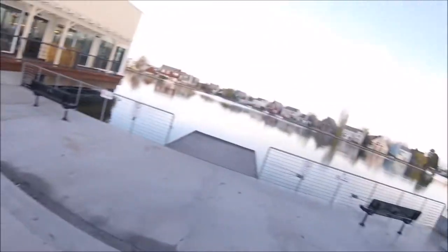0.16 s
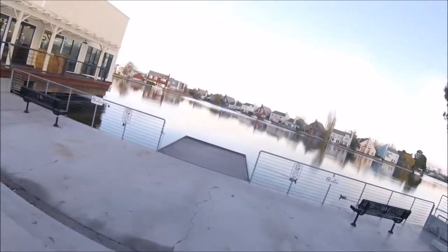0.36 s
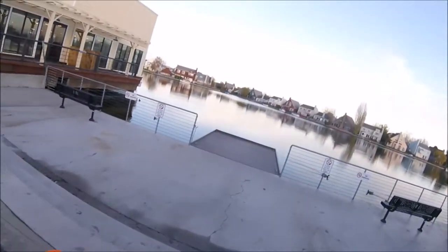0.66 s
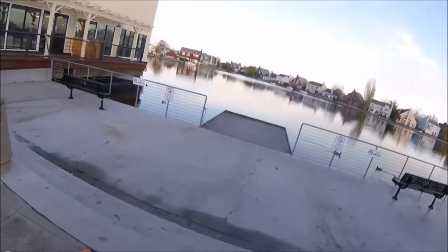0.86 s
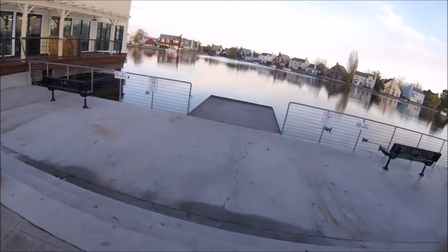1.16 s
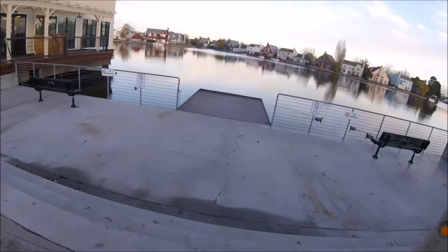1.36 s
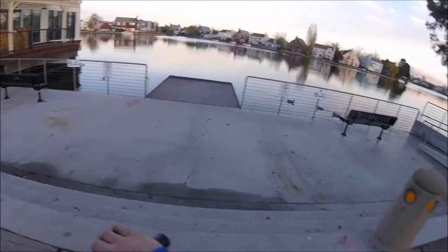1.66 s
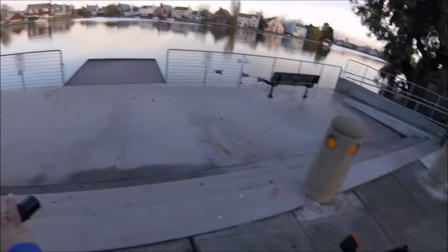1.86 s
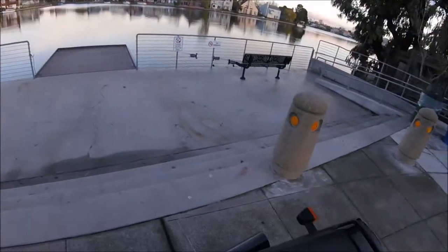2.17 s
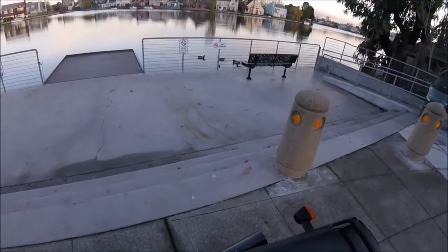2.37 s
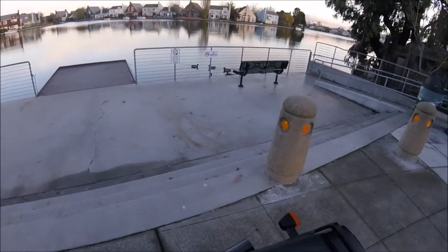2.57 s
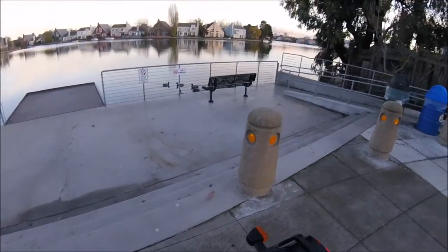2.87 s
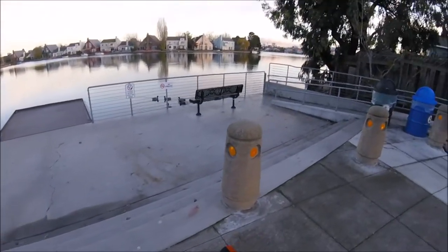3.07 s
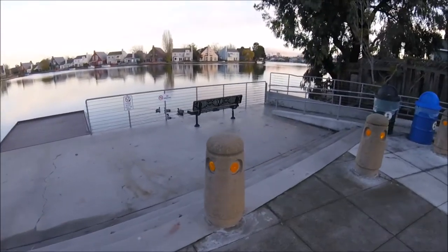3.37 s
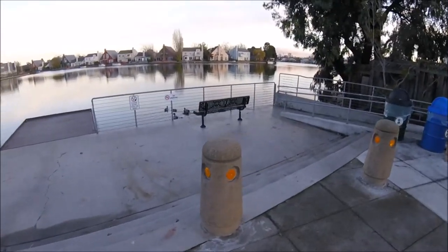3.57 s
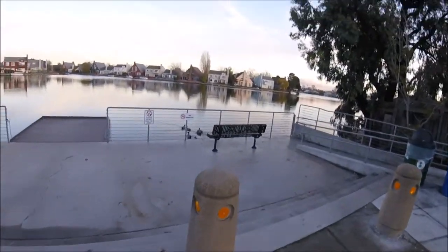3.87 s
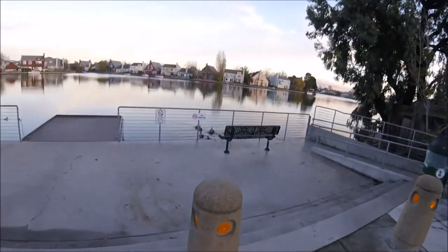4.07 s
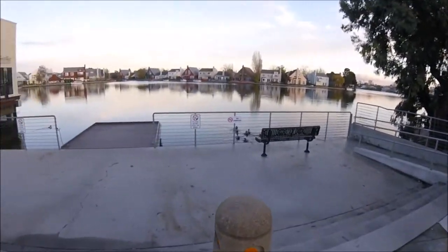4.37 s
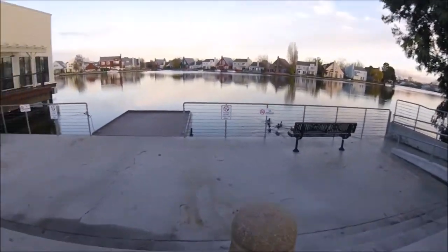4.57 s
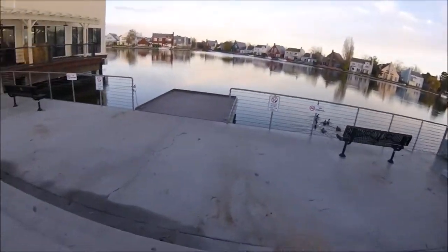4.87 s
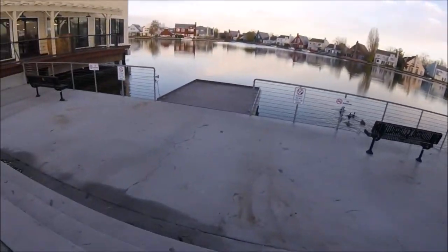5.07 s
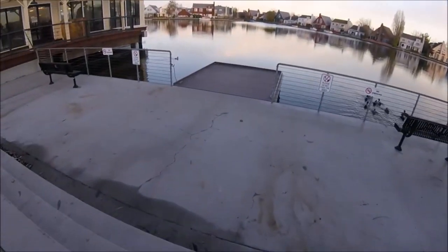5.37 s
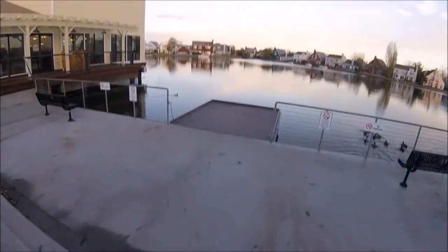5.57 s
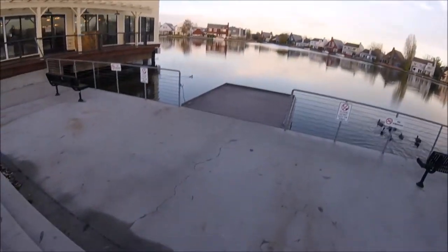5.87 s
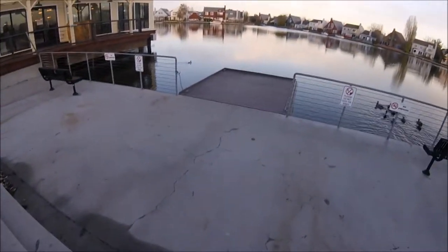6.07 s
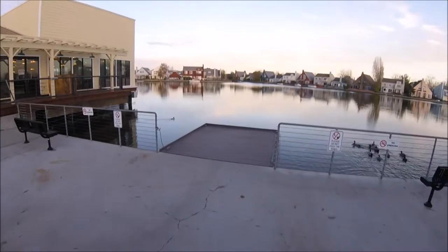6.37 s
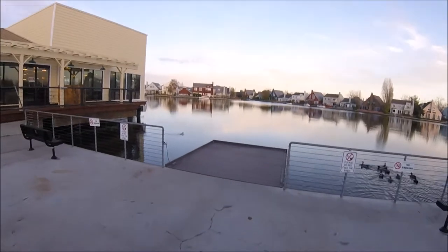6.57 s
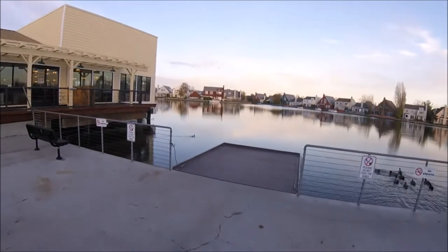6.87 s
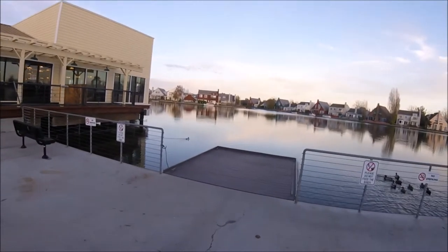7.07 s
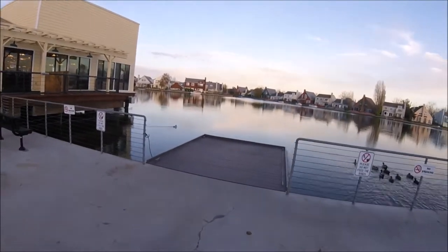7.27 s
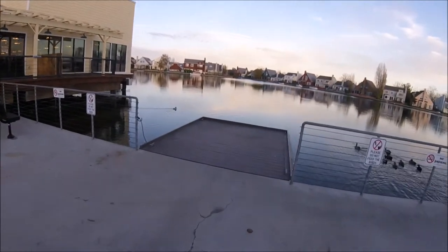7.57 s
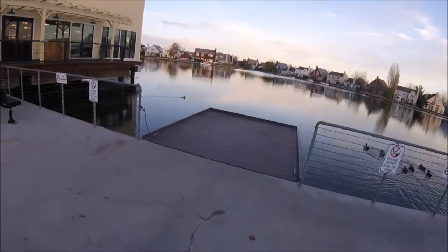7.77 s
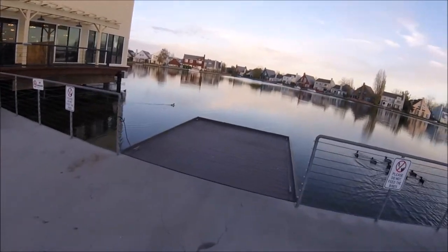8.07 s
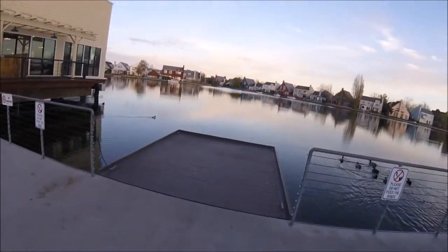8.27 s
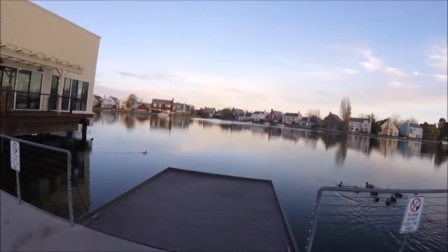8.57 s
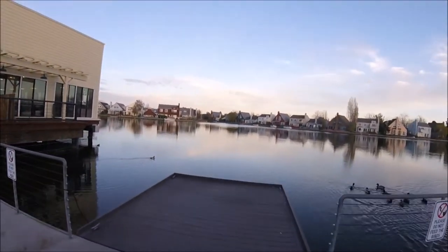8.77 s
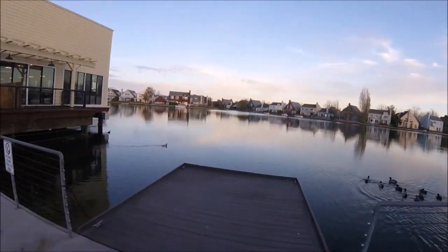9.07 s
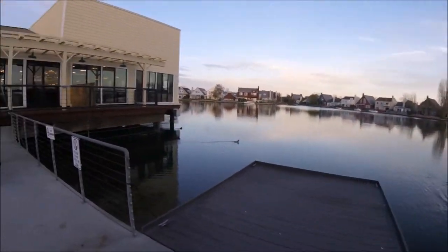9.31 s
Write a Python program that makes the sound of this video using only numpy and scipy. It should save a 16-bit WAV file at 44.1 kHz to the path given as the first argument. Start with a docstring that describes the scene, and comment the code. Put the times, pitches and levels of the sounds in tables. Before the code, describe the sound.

Outdoors, a motorcycle engine throbs unevenly at idle, with a faint gear whine and ticking hiss over it. A sleeve rasps and small metal pieces chink near the body-worn microphone. Then come low footstep bumps and clicks of riding gear, thickest in the second half. The engine dips suddenly at some of these bumps and ends quieter, without ever stopping.

```python
"""A concrete waterfront, close to an idling four-stroke motorcycle, on the mono microphone of a camera worn by
the rider, who gets off and walks toward the water. The cylinders fire lumpily, in pairs a quarter turn apart; a
weak one mostly misses, but catches in runs. The firings ring the silencer, over valve ticks and the whirr and
whine of gears. Right at the microphone clothes rustle, a buckle chinks and steps jolt the camera; the engine's
level drops suddenly at some jolts and ends quieter."""
import sys
import numpy as np
from scipy import signal
from scipy.fft import rfft, irfft
from scipy.io import wavfile
from scipy.ndimage import uniform_filter1d

SR = 44100
rng = np.random.default_rng(int(sys.argv[2]) if len(sys.argv) > 2 else 0)


def materialize(psi):
    """Save the field psi as 16-bit PCM at rate SR to the path in sys.argv[1].

    A 1-D psi becomes a single channel; in a 2-D psi each row is a channel.
    """
    bounded = np.clip(np.atleast_2d(psi).T, -1, 1)
    quanta = np.round(bounded * 32767).astype(np.int16)
    wavfile.write(sys.argv[1], SR, quanta)


N = 416304
TIME = np.arange(N) / SR
FREQ = np.arange(N + 1) * SR / (2 * N) + 1e-6

# the engine's level at the microphone drops suddenly at some jolts, partly recovers, and ends quieter: (time
# [s], gain [dB])
ENGINE_GAIN = [(0, -1.45), (1.6, 1), (2.2, 1.5), (2.9, 0.5), (3.922, 0.5), (3.938, -4), (4.7, -1),
               (5.6, 0.5), (6.22, 0), (6.35, -4.5), (7.12, -4.5), (7.27, -10), (7.6, -8.5), (7.76, -13.5),
               (8.3, -13), (9.05, -10), (9.44, -11)]
# the crankshaft's hunting idle: (time [s], speed [turns/s])
CRANK_SPEED = [(0.0, 18.537), (0.57, 17.917), (1.07, 18.775), (1.83, 18.749), (2.01, 19.573),
               (2.81, 17.895), (3.46, 18.589), (4.29, 17.599), (4.46, 18.662), (4.88, 17.82),
               (5.91, 18.475), (6.39, 17.362), (6.77, 18.26), (7.01, 17.817), (7.99, 18.276),
               (8.17, 17.882), (9.0, 19.142), (9.44, 18.267)]
# runs in which the weak cylinder catches, empty if they end on an earlier turn than they start:
# (start [s], end [s], top strength [0-1])
CATCH_RUNS = [(0.14, 0.73, 0.6), (1.02, 0.99, 0.7), (2.08, 4.04, 0.78), (4.38, 4.38, 0.8), (5.91, 5.7, 0.6)]
# the steady pair's second firing against its first: (time [s], strength [ratio])
SECOND_FIRING = [(0, 0.92), (1, 0.86), (2.1, 0.54), (2.35, 0.59), (2.5, 0.67), (3, 1), (3.4, 0.85),
                 (4.2, 0.65), (5, 0.6), (6.5, 0.78), (7.8, 0.8), (9.4, 0.83)]

# silencer resonances: (frequency [Hz], width [Hz], gain [dB])
SILENCER_MODES = [(42.6, 41, 3.5), (100.8, 64.9, 8), (150, 14.7, 8.5)]
# the boom's deep bass, falling away as the rider leaves: (time [s], gain [dB])
BASS_GAIN = [(0, -1), (5, -2), (6, -4.5), (7.5, -1.5), (8.4, -2.5), (9.44, -6.5)]
# lower and higher pipe resonances: (frequency [Hz], width [Hz], gain [dB])
PIPE_LOW_MODES = [(185.6, 24.2, 5.5), (220.6, 17, 4), (238, 29, 5)]
PIPE_HIGH_MODES = [(248, 24, 10.5), (324, 12, 8.5), (486, 26, 11)]
# the higher ones against the lower, as the microphone moves round the machine: (time [s], gain [dB])
HUM_GAIN = [(0, 0), (1.2, 1), (2.2, 0), (3.4, 1), (4.5, 0), (5.6, -2.5), (6.6, -20), (7.5, -13),
            (9.4, -16.5)]
# the pipe's bark along that path, before ENGINE_GAIN: (time [s], level [dB])
BARK_LEVEL = [(0, -37), (1.58, -37.5), (1.9, -31), (2.85, -34), (3.08, -30.5), (3.45, -34.5), (3.8, -31),
              (4.1, -33.5), (4.6, -35.5), (5.7, -44), (6.7, -28.5), (7.5, -25.5), (8.4, -30), (9.44, -25)]

# colours of gear whirr, rattle, hiss and microphone-port ring: (frequency [Hz], spectral density [dB])
WHIRR_COLOUR = [(200, -9.5), (360, 3), (480, 0), (600, -2), (665, -3.5), (765, -6.5), (850, -3.5),
                (1000, -6), (1120, -11.5), (1250, -16), (1700, -33), (3000, -55)]
RATTLE_COLOUR = [(800, -21.5), (1300, 3.5), (1720, 2.5), (2000, -1), (2600, -3), (3000, -7), (3600, -8.5),
                 (4300, -42.5), (6000, -34), (10000, -44)]
HISS_COLOUR = [(2500, -19.5), (4000, -6), (4500, -6.5), (5000, -0.5), (5700, -0.5), (6500, -16.5),
               (7200, -9.5), (8200, -12.5), (9200, -17.5), (10000, -25.5), (12000, -27), (14500, -46)]
MIC_PORT_COLOUR = [(5600, -33), (6100, -7), (6310, -7.5), (6400, -1.5), (6490, 1.5), (6600, -5.5),
                   (6750, -6.5), (7050, -17.5), (7210, -14), (7400, -23.5), (8000, -41)]
# gear whirr, treble hiss and a steady tone, before ENGINE_GAIN: (time [s], level [dB])
WHIRR_LEVEL = [(0, -39.5), (1.55, -43), (1.95, -41), (2.7, -44), (3.3, -41), (3.88, -43), (4.05, -45),
               (5.8, -44.5), (6.6, -45.5), (7.6, -45.5), (8.5, -43), (9.44, -39.5)]
HISS_LEVEL = [(0, -53), (.8, -55.5), (1.6, -51.5), (2.7, -54), (3.9, -58.5), (5.6, -55.5), (6.5, -59),
              (7.3, -56.5), (7.9, -60.5), (9.44, -55.5)]
PUMP_LEVEL = [(0, -60), (1.6, -57), (3.5, -54), (4.5, -61), (6, -61), (7.2, -56), (9.44, -58)]
# resonances of the engine cases and the thin covers: (frequency [Hz], width [Hz], gain [dB])
CASE_MODES = [(720, 50, -1.5), (791, 30, -1)]
COVER_MODES = [(1112, 41, 3.5), (1504, 82, -3.5), (1694, 48, 2.5), (1943, 80, -3.5), (2170, 140, -6),
               (3016, 64, -6.5), (3330, 47, -13)]
# case ring with whine, and rattle with cover ring, before ENGINE_GAIN: (time [s], gain [dB])
SING_GAIN = [(0, -51), (2.1, -52), (2.35, -44), (2.75, -47), (3.05, -52), (3.6, -49), (4.05, -58),
             (4.9, -50), (5.8, -55.5), (6.8, -49.5), (7.5, -54), (8.4, -48), (9.44, -52.5)]
CLATTER_GAIN = [(0, -48.5), (.6, -51.5), (1.5, -51), (3, -50.5), (4.1, -51.5), (5.7, -50), (7, -48.5),
                (7.85, -51), (8.6, -47), (9.44, -47)]
# the covers' ring against the rattle: (time [s], relative level [dB])
COVERS_OVER_RATTLE = [(0, -4), (1.9, -1), (2.5, -3), (4.2, -1), (5.5, -1), (6.8, -2.5), (8, -4),
                      (9.44, -10.5)]
# the gears' thin whine: (time [s], pitch [Hz])
WHINE_PITCH = [(0, 765), (1.1, 755), (2.3, 778), (3.1, 752), (3.5, 772), (4.3, 740), (4.95, 731),
               (5.4, 757), (6.7, 755), (7.6, 766), (8.9, 782)]

# steps and sways jolt the camera: (time [s], pressure swing [full scale], frequency [Hz])
CAMERA_JOLTS = [(3.315, -0.17, 31.3), (3.986, -0.31, 28), (4.638, -0.2, 30), (5.141, -0.28, 38),
                (5.734, -0.14, 32.2), (6.343, -0.38, 26.8), (6.427, -0.25, 25.4), (6.822, -0.29, 23),
                (7.191, 0.24, 75), (7.208, -0.5, 32.7), (7.671, 0.18, 65.4), (7.705, 0.4, 29),
                (7.79, 0.25, 26.9), (7.937, 0.2, 36.3), (8.126, 0.12, 22), (9.425, -0.22, 29.6)]
# riding gear clicks against the camera: (time [s], peak [dB], resonance [Hz], quality factor [ratio])
CAMERA_CLICKS = [(3.922, -18, 2200, 0.1), (6.297, -28, 800, 2), (7.167, -24, 3200, 0.66),
                 (7.189, -16, 775, 0.4), (7.635, -45, 4030, .4), (7.668, -30, 520, .8),
                 (7.795, -39, 4000, 0.37), (7.906, -41, 900, .7), (8.181, -34, 1050, 5.1),
                 (8.204, -25, 1600, 0.2), (8.244, -32, 1300, .4)]
# riding gear brushes past: (middle [s], half length [s], hiss [dB], port ring [dB], low scrape [dB])
CLOTH_STROKES = [(0.097, 0.0089, -54, -42.5, -77), (.96, 0.12, -58, -53, -50),
                 (1.718, 0.29, -70, -47.5, -71), (2.044, 0.14, -56, -77, -52),
                 (2.712, 0.32, -54, -58.5, -50.5), (4.904, 0.03, -66, -57, -55),
                 (6.194, 0.045, -66, -57.5, -51), (6.776, 0.085, -62, -71, -63),
                 (7.243, 0.067, -64, -67, -57.5), (8.61, 0.26, -85, -89, -59),
                 (8.893, 0.043, -67, -64, -62), (9.117, 0.17, -62, -64, -58), (9.43, 0.047, -62, -61, -58)]
# colours of the cloth's low scrape and the sleeve's rasp: (frequency [Hz], spectral density [dB])
SCRAPE_COLOUR = [(1000, -0.5), (1700, 0.5), (2300, -2.5), (3000, -2), (3600, -8), (4500, -15.5)]
RASP_COLOUR = [(900, -20), (1110, -3), (1400, -14), (1690, 0), (1980, -18), (2360, -6), (2730, -18),
               (4230, -15), (4950, -6), (5900, -16), (6150, -1), (6450, 3.5), (6900, -8), (7680, -10),
               (8100, -22.5), (9100, -22), (9600, -46)]
# loose metal, perhaps a buckle, rattles softly: (time [s], peak [dB])
BUCKLE_CHINKS = [(0.929, -41), (0.947, -34), (0.959, -38), (1.012, -38), (1.898, -39), (1.919, -40),
                 (1.945, -37), (5.983, -42), (6.005, -38), (6.042, -42), (6.124, -40)]
# its resonances: (frequency [Hz], width [Hz], gain [dB])
BUCKLE_MODES = [(1650, 78, 1), (2420, 130, -7.5), (3100, 64, -4.5), (3170, 42, -5), (3520, 60, -6)]
# colours of moving air and the microphone's own noise: (frequency [Hz], spectral density [dB])
RUMBLE_COLOUR = [(10, -13.5), (28, -15), (42, -17), (70, -17), (200, -38), (600, -74)]
MIC_NOISE_COLOUR = [(1000, 1.5), (8500, 1.5), (10000, -1.5), (14000, -6.5)]


def firings():
    """One cylinder leads each turn, its partner follows every other; gives lead times, spikes, puffs."""
    quarter_turn_s, jitter_s = .01345, .00015
    scatter_db, gas_scatter_db = .65, 1.8
    paired_gas_db, catch_gas_db = -6, 4  # a pair's first puff and a catch's, against the others
    turns = .587 + np.cumsum(curves(CRANK_SPEED)[0]) / SR
    lead = np.interp(np.arange(1, int(turns[-1]) + 1), turns, TIME)
    # the light flywheel makes every turn a little long or short
    lead = lead + .00025 * rng.standard_normal(len(lead))
    partner = lead[1::2] + quarter_turn_s
    chance = rng.standard_normal((len(lead) + len(partner), 3))
    times = np.concatenate([lead, partner]) + jitter_s * chance[:, 0]
    sizes = np.concatenate([np.ones(len(lead)), np.interp(partner, *np.transpose(SECOND_FIRING))])
    gas_db = np.concatenate([paired_gas_db * (np.arange(len(lead)) % 2), np.zeros(len(partner))])
    weak_turns, strength = catches(lead)
    caught = impulses(lead[weak_turns] + quarter_turn_s, strength)
    spikes = impulses(times, sizes * undb(scatter_db * chance[:, 1])) + caught
    puffs = impulses(times, undb(gas_db + gas_scatter_db * chance[:, 2])) + undb(catch_gas_db) * caught
    return lead, spikes, puffs


def catches(lead, every_turns=6):
    """The weak cylinder catches every few turns of a run, hardest midway; gives turns and strengths."""
    turns, strengths = [], []
    for start_s, end_s, top in CATCH_RUNS:
        first, last = np.abs(lead - start_s).argmin(), np.abs(lead - end_s).argmin()
        run = np.arange(first, last + 1, every_turns)
        arch = np.sin(np.pi * np.arange(1, len(run) + 1) / (len(run) + 1))
        turns.append(run)
        strengths.append(top * arch ** 0.16)
    return np.concatenate(turns), np.concatenate(strengths)


def exhaust(spikes, puffs):
    """Each firing booms in the silencer; its short, nearly clean puff barks and hums in the pipe."""
    boom_gain_db, bass_edge_hz = -13.5, 110
    boom = filtered(spikes, pipe(SILENCER_MODES) * lowpass(hz=146, q=1.85))
    bass = filtered(boom, 1 / (1 + (FREQ / bass_edge_hz) ** 10)) / np.std(boom)
    boom = level(boom, 0) + (undb(curves(BASS_GAIN)[0]) - 1) * bass
    puff_noise = level(bursts(puffs, decay_s=0.005), -9)
    flow_noise = level(rng.standard_normal(N), -12)
    gas_band = lowpass(hz=460, q=0.12) * (1 - lowpass(hz=106, q=0.9))
    gas = filtered(level(puffs, 0) + puff_noise + flow_noise, gas_band * delay(lag_s=.0015))
    # the higher resonances ride on a broad hump; the lower ones answer after a trip along the pipe
    hump = resonance(hz=290, width=175) ** 2
    hum = filtered(gas, hump * (1 + sum(resonance(*mode) for mode in PIPE_HIGH_MODES)))
    low_bark = filtered(gas, pipe(PIPE_LOW_MODES) * delay(lag_s=0.00336))
    bark = low_bark + undb(curves(HUM_GAIN)[0]) * hum
    return boom * undb(boom_gain_db) + level(bark, curves(BARK_LEVEL)[0])


def gears(lead, engine_db):
    """Gears and chains whirr, whine and rattle in time with the crank; ticks ring cases and covers."""
    beat = level(bursts(impulses(lead, np.ones(len(lead))), decay_s=0.014), 0)
    meshing = rng.standard_normal(N) + .5 * grains(rate=200, scatter_db=3.5, decay_s=0.0053)
    whirr = colour(meshing, WHIRR_COLOUR)
    shaking = rng.standard_normal(N) + 0.59 * beat + .5 * grains(rate=120, scatter_db=0, decay_s=0.0039)
    rattle = level(colour(shaking, RATTLE_COLOUR), 0)
    case_ticks = grains(rate=700, scatter_db=-0.5, decay_s=0.00086)
    cases = filtered(case_ticks, pipe(CASE_MODES) * lowpass(hz=1310, q=0.33))
    cover_ticks = grains(rate=500, scatter_db=1.2, decay_s=0.0016)
    covers = filtered(cover_ticks, pipe(COVER_MODES) * lowpass(hz=3600, q=0.97))
    singing = (level(cases, 0) + level(whine(), 0)) * undb(curves(SING_GAIN)[0])
    whirr = level(whirr * flicker(rate=23, depth_db=1.45), curves(WHIRR_LEVEL)[0])
    clatter = (rattle + level(covers, curves(COVERS_OVER_RATTLE)[0])) * flicker(rate=24, depth_db=1)
    return (whirr + singing + clatter * undb(curves(CLATTER_GAIN)[0])) * undb(engine_db)


def whine(surge_rad=.6):
    """A thin tone from the gears, which surges slightly within each turn and wanders a little."""
    hz = curves(WHINE_PITCH)[0] * flicker(rate=40, depth_db=.06)
    crank_angle = 2 * np.pi * np.cumsum(curves(CRANK_SPEED)[0]) / SR
    phase = 2 * np.pi * np.cumsum(hz) / SR + surge_rad * np.sin(crank_angle)
    return np.sin(phase) * flicker(rate=25, depth_db=2.5)


def valve_hiss(lead, engine_db):
    """A fine hiss that pulses on every turn, with a thin high ring from the microphone port."""
    hiss_db = curves(HISS_LEVEL)[0] + engine_db
    taps = impulses(lead + 0.0038, undb(2 * rng.standard_normal(len(lead))))
    valves = level(bursts(taps, decay_s=0.008), 0)
    fizz = rng.standard_normal(N) + 0.65 * grains(rate=120, scatter_db=-0.5, decay_s=0.00066)
    hiss = level(colour(fizz + .28 * valves, HISS_COLOUR), hiss_db)
    port_ring = level(colour(rng.standard_normal(N) + 0.5 * valves, MIC_PORT_COLOUR), hiss_db - 2)
    return hiss * flicker(rate=30, depth_db=.7) + port_ring * flicker(rate=30, depth_db=1.6)


def pump(engine_db):
    """A faint tone, perhaps the fuel pump, that holds its pitch while the idle hunts."""
    hz = 630.5 * flicker(rate=8, depth_db=.02)
    return level(np.sin(2 * np.pi * np.cumsum(hz) / SR), curves(PUMP_LEVEL)[0] + engine_db)


def jolts(half_cycles=0.77):
    """The camera swings once or twice at each step, over a faint rumble of moving air."""
    out = level(colour(rng.standard_normal(N), RUMBLE_COLOUR) * flicker(rate=15, depth_db=4), -30)
    for s, swing, hz in CAMERA_JOLTS:
        out += swing * swell(s, half_cycles / hz) * np.cos(2 * np.pi * hz * (TIME - s))
    return out


def clicks():
    """Riding gear knocks on the camera: short, gritty pushes, some dull, a few ringing briefly."""
    out = np.zeros(N)
    for s, db, hz, q in CAMERA_CLICKS:
        spike = impulses(np.array([s]), np.ones(1))
        push = spike + 0.064 * bursts(spike, decay_s=0.001)
        snap = filtered(push, lowpass(hz, q) * lowpass(hz=7500, q=0.62) ** 2)
        out += undb(db) * snap / np.abs(snap).max()
    return out


def rustles():
    """Cloth brushes by in swells of fine grains: hiss, the microphone port's ring and a lower scrape."""
    friction = rng.standard_normal(N) + .6 * grains(rate=650, scatter_db=1, decay_s=.002)
    friction = filtered(friction, lowpass(hz=8000, q=1.0))
    colours = (HISS_COLOUR, MIC_PORT_COLOUR, SCRAPE_COLOUR)
    bands = np.array([level(colour(friction, points), 0) for points in colours])
    return sum(swell(s, half_s) * (undb(band_db) @ bands) for s, half_s, *band_db in CLOTH_STROKES)


def sleeve_rasp():
    """A stiff sleeve catches and slips in one coarse, bright swell, on a reach for the handlebar."""
    friction = .7 * rng.standard_normal(N) + grains(rate=350, scatter_db=1.5, decay_s=.0015)
    return level(colour(friction, RASP_COLOUR), -36) * swell(s=1.863, half_s=0.099)


def chinks(chatter_s=.006, detune=.015):
    """A brief chatter of metal rings the buckle's modes, a little differently each time."""
    out, t = np.zeros(N), TIME[:SR // 10]
    for s, db in BUCKLE_CHINKS:
        pitch = 1 + detune * rng.standard_normal()
        ring = sum(undb(gain) * width * np.exp(-np.pi * width * t) * np.sin(2 * np.pi * hz * pitch * t)
                   for hz, width, gain in BUCKLE_MODES)
        chatter = rng.standard_normal(len(t)) * np.exp(-t / chatter_s)
        chink = signal.fftconvolve(ring, chatter)
        start = int(s * SR)
        out[start:start + len(chink)] += undb(db) * chink / np.abs(chink).max()
    return out


def waterfront_reflections(sound, relative_db, decay_s):
    """Concrete steps and walls scatter a faint short tail, which shifts as the microphone moves."""
    gap_s, shift_hz = .012, 0.477
    decay = np.exp(-TIME / decay_s) * (TIME > gap_s)
    tails = [filtered(sound, rfft(rng.standard_normal(N) * decay, 2 * N)) for _ in range(2)]
    angle = 2 * np.pi * shift_hz * TIME
    return level(tails[0] * np.cos(angle) + tails[1] * np.sin(angle), relative_db) * np.std(sound)


def undb(db):
    """Decibels to gain."""
    return 10 ** (np.asarray(db) / 20)


def level(x, db):
    """Scale to an rms level, steady or moving."""
    return x * undb(db) / np.sqrt(np.mean(x ** 2))


def curves(table):
    """Each column of a table joined by straight lines in time."""
    s, *columns = np.transpose(table)
    return [np.interp(TIME, s, c) for c in columns]


def swell(s, half_s):
    """A smooth rise and fall around one moment."""
    return np.exp(-((TIME - s) / half_s) ** 2)


def flicker(rate, depth_db):
    """A factor near 1 that glides to a new random value `rate` times a second."""
    hold = int(SR / rate)
    held = np.repeat(rng.standard_normal(N // hold + 1), hold)
    return undb(depth_db * uniform_filter1d(held, hold)[:N])


def filtered(x, response):
    """Pass a sound through a frequency response."""
    return irfft(rfft(x, 2 * N) * response)[:N]


def lowpass(hz, q):
    """Response of a mass on a spring."""
    return 1 / (1 + 1j * FREQ / (hz * q) - (FREQ / hz) ** 2)


def resonance(hz, width, db=0):
    """Response of one resonance."""
    return undb(db) / (1 + 1j * (FREQ ** 2 - hz ** 2) / (FREQ * width))


def pipe(modes):
    """Response of resonances that alternate in sign, as at a pipe's open end."""
    return -sum((-1) ** k * resonance(*mode) for k, mode in enumerate(modes))


def delay(lag_s):
    """Response of a short journey."""
    return np.exp(-2j * np.pi * FREQ * lag_s)


def colour(x, points):
    """Shape a sound by a short spectrum with steep skirts."""
    hz, db = np.transpose(points)
    skirts = np.minimum(1, FREQ / hz[0]) ** 2 * np.minimum(1, hz[-1] / FREQ) ** 2
    return filtered(x, undb(np.interp(np.log(FREQ), np.log(hz), db)) * skirts)


def impulses(times, sizes):
    """One spike for each time."""
    inside = (times >= 0) & (times < (N - 1) / SR)
    return np.bincount((times[inside] * SR).astype(int), sizes[inside], N)


def bursts(spikes, decay_s):
    """Every spike starts a puff of noise that dies away."""
    return signal.lfilter([1], [1, -np.exp(-1 / (decay_s * SR))], spikes) * rng.standard_normal(N)


def grains(rate, scatter_db, decay_s):
    """Random ticks, `rate` a second, scattered in size; rms 1."""
    draws = rng.random((int(rate * N / SR), 2))
    sizes = undb(-scatter_db * np.log(.01 + .99 * draws[:, 1]))
    return level(bursts(impulses(draws[:, 0] * N / SR, sizes), decay_s), 0)


def scene():
    """At one microphone: the engine, its reflections, which stay as it dips, and the rider close up."""
    lead, spikes, puffs = firings()
    engine_db = curves(ENGINE_GAIN)[0]
    throb = exhaust(spikes, puffs)
    reflections = waterfront_reflections(throb, relative_db=-27, decay_s=.06)
    machinery = gears(lead, engine_db) + pump(engine_db) + valve_hiss(lead, engine_db)
    rider = rustles() + sleeve_rasp() + jolts() + clicks() + chinks()
    return (throb * undb(engine_db) + machinery + rider + reflections)[None]


def record(dry):
    """The camera adds its microphone's faint noise and cuts the top."""
    top_hz = 14500
    noisy = dry + level(colour(rng.standard_normal(N), MIC_NOISE_COLOUR), -72.5)
    return signal.sosfilt(signal.ellip(8, .2, 70, top_hz, fs=SR, output="sos"), noisy)


dry = scene()
out = record(dry)
materialize(out)
```